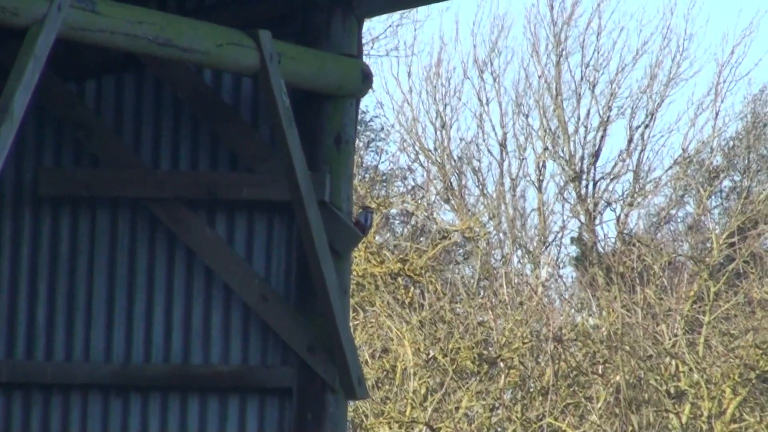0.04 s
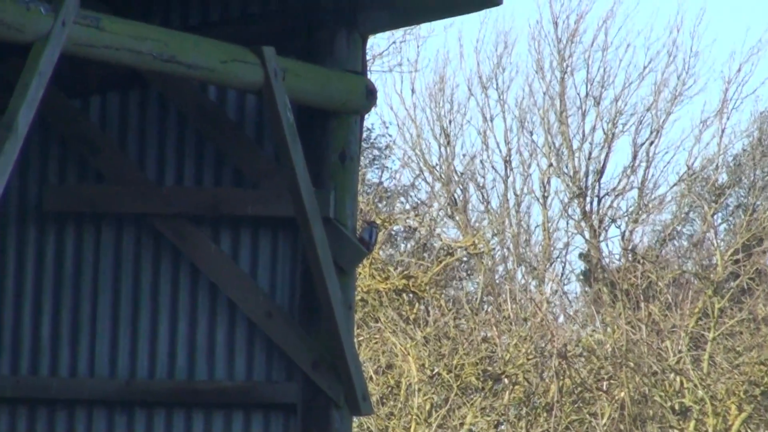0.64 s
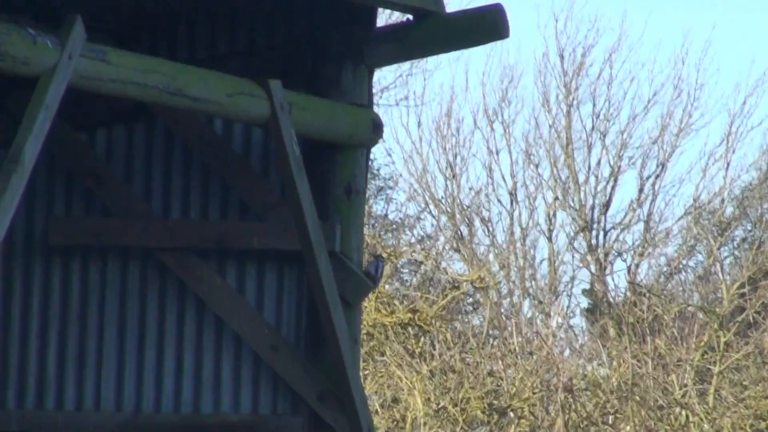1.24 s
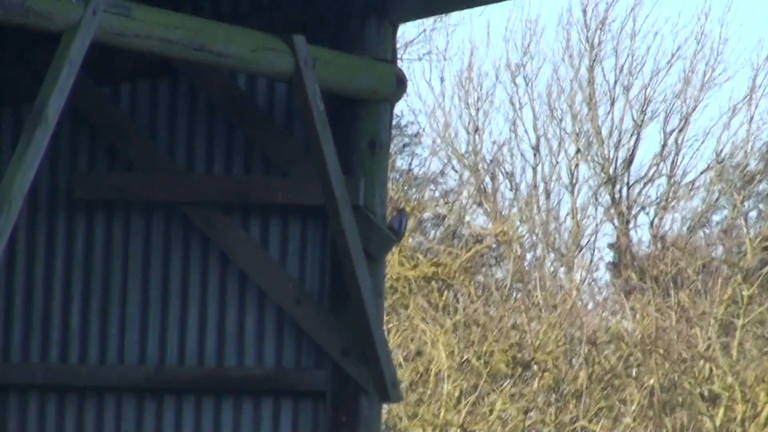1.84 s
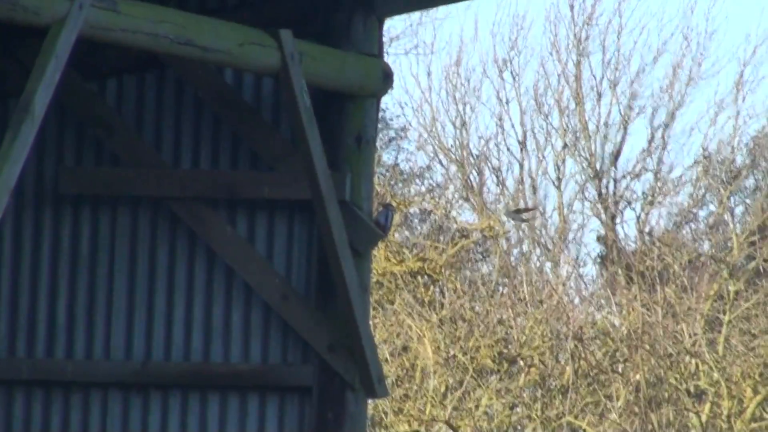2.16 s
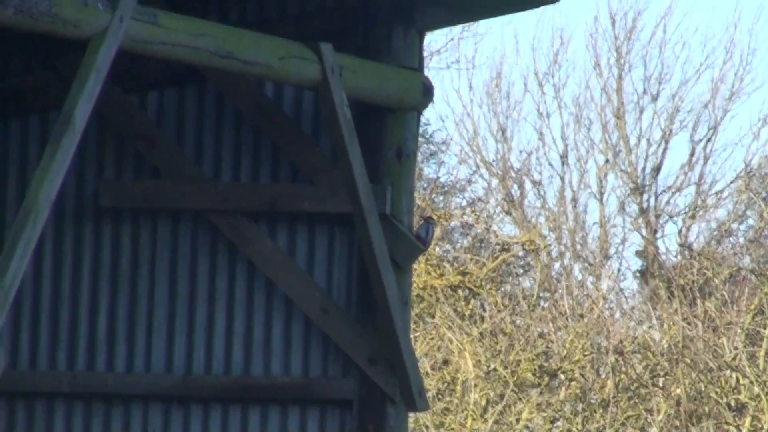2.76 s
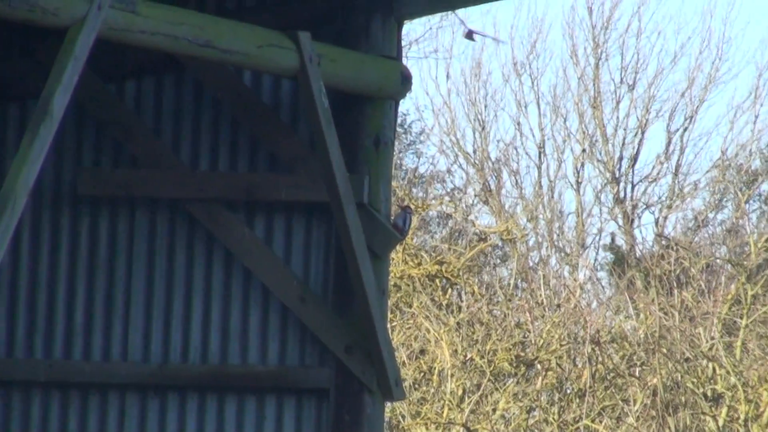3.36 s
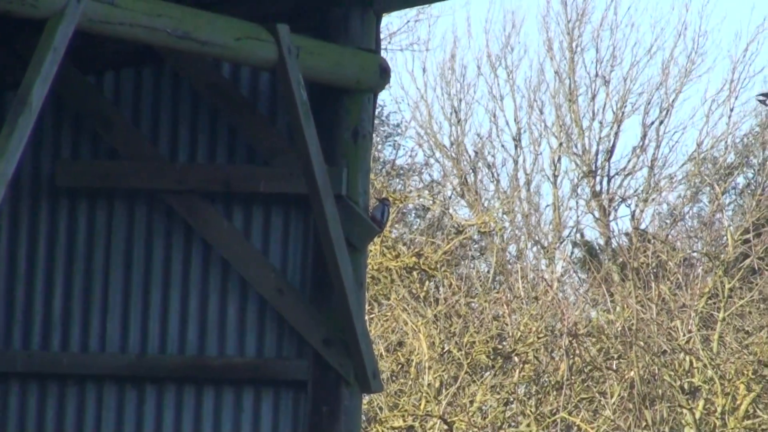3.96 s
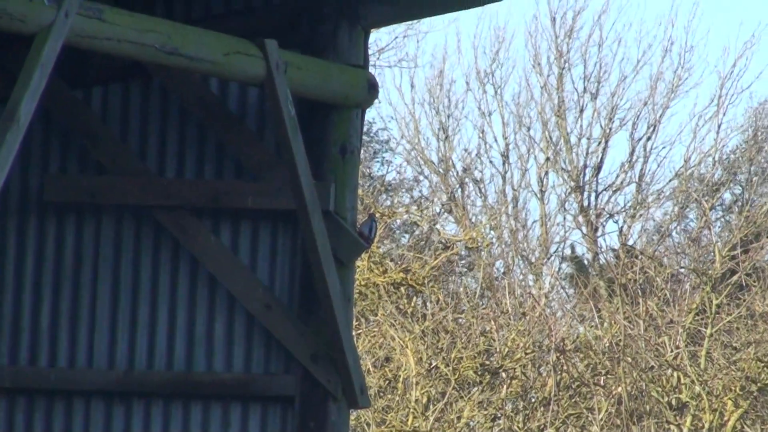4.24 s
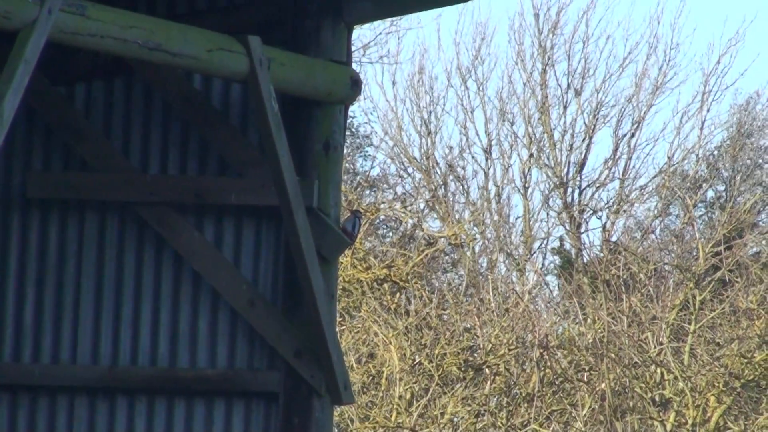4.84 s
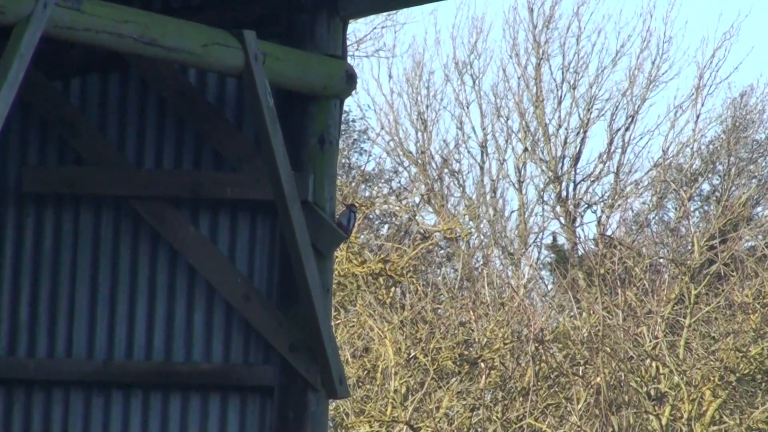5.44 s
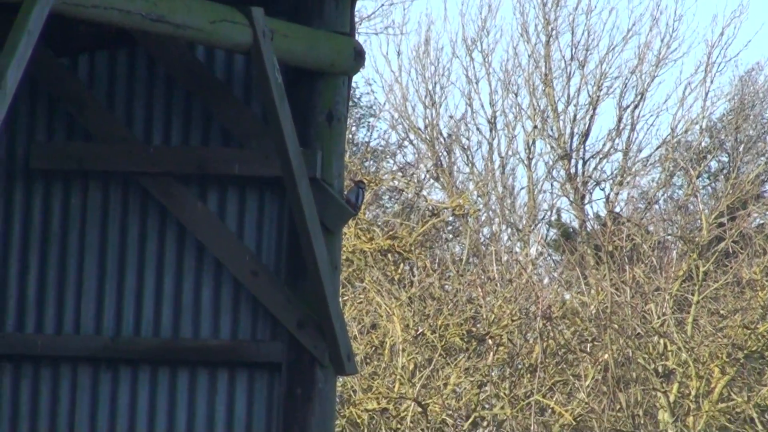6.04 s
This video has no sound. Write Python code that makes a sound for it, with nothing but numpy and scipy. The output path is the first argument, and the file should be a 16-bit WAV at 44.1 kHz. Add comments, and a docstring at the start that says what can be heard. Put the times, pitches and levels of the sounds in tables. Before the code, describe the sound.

Outdoors by a hedgerow, the end of a woodpecker's drum roll rings out loudly and fades among the trees. Gusts of wind follow, buffeting the microphone with a low rumble and soft pops, strongest near the end. Throughout, faint small birds give short chirps, falling whistles, dry ticks and a few thin high notes, over a slight hiss of twigs and a distant hush.

```python
"""A woodpecker's last few blows ring a dead branch and echo through the trees. We stand at a winter
hedgerow beside a tin shed: small birds chirp, scold and whistle at several distances, and a nearer one
gives four thin, very high calls. Gusts cross the microphone, hardest near the end, their large eddies
rumbling and their small ones popping at the ports. Behind it all, dry twigs hiss over a soft far hush."""
import sys
import numpy as np
from scipy import signal
from scipy.io import wavfile

SR = 44100
rng = np.random.default_rng(int(sys.argv[2]) if len(sys.argv) > 2 else 0)


def put_to_file(sound):
    """Save the sound as 16-bit audio at rate SR, in the file named by the first command-line argument."""
    columns = np.atleast_2d(sound).T  # one column per channel
    safe = np.clip(columns, -1, 1)
    whole_steps = np.round(safe * 32767)
    wavfile.write(sys.argv[1], SR, whole_steps.astype(np.int16))


N = 273861
TIME = np.arange(N) / SR

# Table levels are relative, ahead of the mix; pan is left minus right.
# how alike airborne noise is on the two channels: (frequency [Hz], likeness [0-1])
AIR_LIKENESS = [(60, 0.9), (500, 1), (2000, 0.21), (7000, 0.48), (9500, 0.56), (11500, 1)]


def woodpecker(level_db=7, low_cut_hz=520):
    """Off in the trees, the last blows of a drum roll ring a branch and echo through the wood."""
    # beak on dead wood: (time [s], level [dB])
    knocks = [(0.001, 1.5), (0.027, 2.5), (0.069, 0.5), (0.111, -1.5)]
    # the branch's modes: (frequency [Hz], width [Hz], level [dB])
    branch = [(580, 340, -10.5), (800, 74, -1), (963, 71, 4.5), (1284, 72, 0), (1478, 26, -2),
              (2100, 500, -13), (2680, 520, -17.5), (4160, 2700, -32.5), (7260, 1500, -36)]
    blows, wood = np.full(N, 1e-18), 0
    for s, db in knocks:
        add(blows, s, from_db([db + level_db]))
    for k, (hz, width, db) in enumerate(branch):
        r = np.exp(-np.pi * width / SR)
        mode = signal.lfilter([1, 0, -1], [1, -2 * r * np.cos(2 * np.pi * hz / SR), r * r], blows)
        wood = wood + (-1) ** k * from_db(db) * (1 - r * r) / 2 * mode
    low_cut = signal.butter(2, low_cut_hz, "high", fs=SR, output="sos")  # a thin branch has little bass
    wood = panned(signal.sosfilt(low_cut, wood), pan_db=-0.3)
    return from_db(-9) * wood + from_db(2) * trees(wood, t60=0.1) + from_db(-2) * trees(wood, t60=0.82)


def thin_calls(hook=0.2, drop=0.1, turn_s=0.0045):
    """The nearest bird: each pitch snaps up, sags slowly and drops away as the note closes."""
    # four high calls: (time [s], length [s], top [Hz], middle [Hz], late [Hz], level [dB], pan [dB])
    calls = [(4.434, .17, 8480, 7720, 7080, -61.5, 8), (4.696, .155, 7740, 7570, 7130, -57.5, 10),
             (4.929, .135, 8000, 7760, 7260, -53, 11), (5.137, .121, 7860, 7670, 7330, -56, 10)]
    out = np.zeros((2, N))
    for s, length, top, middle, late, db, pan_db in calls:
        u = progress(length)
        arch = 1 - hook * np.exp(-u * length / turn_s) - drop * np.exp((u - 1) * length / turn_s)
        swell = np.abs(np.sin(np.pi * u)) ** 0.25
        tone = syrinx(pitch_arc(u, top, middle, late) * arch, waver=0.0057, shimmer_db=1.5)
        add(out, s, panned(from_db(db - 1) * swell * tone, pan_db))
    return out


def phrases(pan_db=6):
    """One bird repeats a slur and two soft pips from the same perch, left of the microphone."""
    # each repeat: (time [s], level [dB])
    repeats = [(.092, -60.5), (0.789, -61.5), (1.55, -59.5), (2.272, -61.5)]
    # its three notes: (delay [s], length [s], middle pitch [Hz], fall [Hz], level [dB])
    phrase = [(0, .037, 2700, 650, -1.5), (0.152, 0.021, 2410, 330, -3.5), (0.238, 0.033, 2335, 262, -5.5)]
    notes = [(s + delay, length, hz, fall, db + note_db, pan_db)
             for s, db in repeats for delay, length, hz, fall, note_db in phrase]
    return whistles(notes, waver=0.013, shimmer_db=0, bow=0.24)


def slurs(fall_hz=1030):
    """Lone whistles along the hedge all fall by the same step, so the short ones are the steepest."""
    # falling notes: (time [s], length [s], middle pitch [Hz], level [dB], pan [dB])
    calls = [(0.596, 0.061, 3150, -64.5, 9), (.705, 0.055, 3850, -71, 7), (1.101, 0.054, 3520, -63.5, 11),
             (1.42, 0.036, 3100, -65, 7), (1.438, .125, 3580, -67.5, 8), (1.623, 0.023, 6600, -72, -2),
             (1.81, 0.03, 6500, -70, -2), (1.945, 0.083, 6100, -64.5, -3), (2.207, 0.12, 3180, -71, 6),
             (2.579, .037, 5180, -70, 13), (2.648, 0.055, 4040, -65.5, 11), (2.94, 0.13, 6960, -81, 5),
             (3.128, 0.023, 3630, -60.5, 8), (3.4, .06, 3430, -64.5, 6), (4.05, 0.034, 4000, -68.5, 10),
             (4.123, 0.027, 2400, -69, 1), (4.135, .038, 4360, -72, 6), (4.335, .042, 3580, -68.5, 6),
             (4.38, 0.047, 7070, -71, 7), (4.795, 0.039, 3650, -66, 7), (5.975, 0.11, 6660, -78, -2),
             (6.131, 0.037, 3440, -65.5, 4)]
    notes = [(s, length, hz, fall_hz, db, pan_db) for s, length, hz, db, pan_db in calls]
    return whistles(notes, waver=0.017, shimmer_db=1.5, bow=0.028)


def chirps(rasp_depth=0.1324):
    """Fast up-down-up sweeps on the left, roughened by a quick flutter of the pitch."""
    # twittering: (time [s], length [s], top pitch [Hz], level [dB], rasp [0-1])
    calls = [(0.182, 0.054, 5480, -58, .55), (0.227, 0.034, 4710, -64, 0.71),
             (1.389, 0.052, 4800, -64.5, 0.43), (1.605, 0.067, 5400, -54.5, 0.23),
             (2.296, 0.1, 5000, -62, 0.74), (3.027, 0.09, 5100, -61.5, .3), (3.245, 0.045, 6250, -56.5, 1),
             (3.265, 0.046, 4900, -53.5, .43), (3.56, 0.071, 5780, -65, .6),
             (3.604, 0.05, 5270, -55.5, 0.4), (4.691, .1, 5200, -61.5, 0.58),
             (5.351, 0.035, 5700, -60, 0.36), (5.445, 0.045, 4220, -62.5, 0.35),
             (5.708, 0.068, 5610, -61, .55), (5.803, 0.034, 6270, -55.5, 0.5),
             (5.824, 0.038, 4970, -53.5, 0.53)]
    # the course of one chirp: (share of its length [0-1], pitch over top pitch [ratio], level [dB])
    zigzag = [(0, 0.6, -7.5), (0.119, .84, -5), (0.298, 0.99, -8), (0.439, .82, -3), (0.582, .67, -3.5),
              (0.658, .68, -13), (0.798, .8, 1.5), (.92, 0.8, -14), (1, 0.91, -12)]
    share, pitch, level_db = np.transpose(zigzag)
    out = np.zeros(N)
    for s, length, top, db, rasp in calls:
        u = progress(length)
        tone = syrinx(top * np.interp(u, share, pitch), waver=rasp * rasp_depth, shimmer_db=1.5)
        add(out, s, from_db(db + np.interp(u, share, level_db)) * tone)
    return panned(out, pan_db=9)


def tiks():
    """A scolding bird gives dry, toneless bursts."""
    # alarm notes: (time [s], length [s], level [dB])
    alarms = [(0.193, 0.03, -56), (0.265, 0.028, -58.5), (3.242, 0.033, -61), (3.352, .015, -60),
              (3.516, 0.04, -56)]
    # their spectrum: (frequency [Hz], density [dB])
    colour = [(1500, -30), (3000, 0), (4500, -0.5), (7500, -6), (11000, -27), (15000, -26)]
    gate = np.zeros(N)
    for s, length, db in alarms:
        add(gate, s, from_db(db) * np.sin(np.pi * progress(length)))
    noise = banded_noise(colour, AIR_LIKENESS, flicker_db=2, flicker_per_s=200)
    return panned(gate * noise, pan_db=5)


def chatter(count=45, first_s=0.4, last_s=4.6, low_hz=3000, high_hz=5200, pan_db=6):
    """Many birds deep in the hedge slip in faint, short falling notes."""
    notes = []
    for when, long, pitch, slope, loud in rng.random((count, 5)):
        s = first_s + when * (last_s - first_s)
        length = 0.02026 + 0.0356 * long
        hz = low_hz * (high_hz / low_hz) ** pitch
        fall = 0.345 * hz * (1 + slope) / 2
        notes.append((s, length, hz, fall, -77 + 4 * loud, pan_db))
    return whistles(notes, waver=0.035, shimmer_db=3, bow=0.058)


def far_notes(sag=0.0178):
    """Birds far off among the trees hold whistles that barely sag."""
    # held notes: (time [s], length [s], pitch [Hz], level [dB], pan [dB])
    calls = [(0.637, 0.126, 4285, -64, -3), (0.947, 0.082, 5020, -68, 8), (1.11, .13, 4300, -65, -4),
             (1.324, 0.31, 1320, -67, -3), (1.611, 0.043, 4226, -57, -1), (1.853, 0.16, 5620, -75, 15),
             (1.94, 0.16, 1162, -64.5, 5), (2.133, 0.084, 4000, -68.5, 9), (2.435, .24, 5290, -73.5, 8),
             (3.193, .077, 6800, -79, 3), (3.615, 0.074, 952, -62.5, 3), (3.74, .21, 3230, -79.5, 6),
             (3.893, .1, 1035, -67.5, 3), (4.547, .17, 3290, -79, -2)]
    notes = [(s, length, hz, sag * hz, db, pan_db) for s, length, hz, db, pan_db in calls]
    return whistles(notes, waver=0.0098, shimmer_db=5.4, bow=0.055)


def wind(buffet_s=0.04, surge_db=1.7, surges_per_s=38):
    """One airflow over the microphone drives both rumble and flutter; single pops ride on top."""
    # wind strength at the microphone: (time [s], level [dB])
    strength = [(0.0, -59), (0.11, -55.5), (0.18, -61.5), (0.29, -53), (0.43, -54), (0.6, -38.5),
                (1.18, -58), (1.31, -41), (2.19, -37.5), (2.27, -47.5), (2.52, -38.0), (3.72, -37),
                (4.08, -49), (4.39, -35.0), (5.29, -46), (5.36, -54.5), (5.96, -22), (6.2, -35.5)]
    # separate buffets: (time of crest [s], gain [dB])
    buffets = [(1.521, 8.5), (1.71, 7.0), (1.809, 6), (2.56, 4.5), (2.66, 4.5), (2.99, 5), (3.1, 6.5),
               (3.22, 3.5), (3.479, 8), (4.581, 5.0), (4.759, 5.5), (4.859, 4.5), (4.991, 9.5), (5.221, 9),
               (5.788, 11), (6.121, 2.5)]
    buffets_db = sum(db * np.exp(-((TIME - s) / buffet_s) ** 2) for s, db in buffets)
    wind_db = curve(strength) + buffets_db + surge_db * drift(surges_per_s)
    return rumble(wind_db) + flutter(wind_db) + pops()


def rumble(wind_db):
    """Large eddies buffet both microphone ports in lumps."""
    # their spectrum: (frequency [Hz], density [dB])
    colour = [(25, -21), (50, -6), (85, -0.5), (130, 0), (200, -4.5), (300, -10.5), (450, -19), (700, -24),
              (1200, -95)]
    # how alike the two ports feel them: (frequency [Hz], likeness [0-1])
    likeness = [(30, 0.45), (90, 0.75), (180, 0.5), (400, 0.48)]
    noise = banded_noise(colour, likeness, flicker_db=3, flicker_per_s=40)
    return panned(from_db(wind_db - 1) * noise, pan_db=-2.1)


def flutter(wind_db, breeze_db=-38, spread_db=7.5):
    """Small eddies stream over the ports; faster wind makes them louder, denser and finer."""
    # choppiness, as small eddies above or below their usual share: (time [s], gain [dB])
    chop = [(0, -10), (1.5, 3.5), (2.2, 4.5), (3.1, -5), (3.7, -9), (4.5, 3), (4.95, -2.5), (5.25, 5.5),
            (5.7, -6), (5.96, -0.5), (6.08, -2), (6.21, -4)]
    excess_db = wind_db - breeze_db
    level_db = -63.5 + 1.66 * excess_db + curve(chop)
    speed_db = 0.7 * excess_db
    per_s = 120 * from_db(1.4 * speed_db)
    out = 0
    for hz, gain_db in [(380, 2), (880, 0), (1400, -11 + 0.72 * speed_db)]:
        sizes = from_db(spread_db * np.minimum(rng.exponential(1, (3, N)), 4))
        signs = rng.choice([-1, 1], (3, N))
        arrivals = rng.random((3, N)) < per_s / SR
        hits = sizes * signs * arrivals / np.sqrt(per_s)
        ports = hits[:2] + 0.5 * hits[2]  # the third stream strikes both ports
        swings = signal.fftconvolve(ports, eddy(hz)[None], "same", axes=1)
        out = out + from_db(gain_db) * rms_one(swings)
    return panned(from_db(level_db) * out, pan_db=-7)


def pops(level_db=5, crest_s=0.0012):
    """The hardest eddies stand out as single soft pops, often on one side of the microphone."""
    # hard eddies: (time [s], level [dB], pitch [Hz], pan [dB])
    hard_eddies = [(1.337, -34.5, 695, -22), (1.534, -42, 790, -29), (1.611, -35, 1093, -16),
                   (1.713, -33, 655, -26), (1.784, -36, 780, -17), (1.831, -36.5, 700, 1.5),
                   (1.922, -35, 1060, 2.0), (1.996, -33, 790, 0), (2.03, -40, 875, 2.5),
                   (2.053, -39, 696, 0), (2.153, -40, 743, 1.0), (2.163, -37.5, 1020, -1),
                   (2.413, -41, 821, 0.5), (2.566, -39, 703, -23), (2.638, -25.5, 755, -21),
                   (2.703, -34, 700, -23), (2.832, -43, 700, -13), (3.486, -40.5, 810, -0.5),
                   (4.413, -40, 670, -4), (4.588, -42, 720, 1), (5.238, -39.5, 830, -1.0),
                   (5.654, -32, 740, -20), (5.769, -29, 800, -25), (5.801, -18.5, 1075, -19),
                   (5.943, -31, 1030, 4), (5.974, -23.5, 930, 3), (6.098, -21.5, 869, -18),
                   (6.173, -37, 754, -9.0)]
    out = np.zeros((2, N))
    for s, db, hz, pan_db in hard_eddies:
        swing = eddy(hz)
        add(out, s + crest_s - len(swing) / 2 / SR, panned(from_db(db + level_db) * swing, pan_db))
    return out


def eddy(hz, width_cycles=0.59, rise=0.09):
    """The pressure swing of one vortex crossing a port: a cycle or two that quicken as it passes."""
    cycles = np.arange(-300, 301) / SR * hz
    return np.sin(2 * np.pi * (cycles + rise * cycles ** 2)) * np.exp(-(cycles / width_cycles) ** 2)


def rustle():
    """Dry twigs hiss faintly as the breeze reaches the hedge."""
    # breeze in the twigs: (time [s], level [dB])
    breeze = [(0, -77), (1.2, -79), (1.75, -68), (2.2, -74), (3.3, -70), (4.0, -70.5), (4.7, -70),
              (5.4, -67), (5.8, -68), (6.21, -72)]
    # the hiss's spectrum: (frequency [Hz], density [dB])
    colour = [(1500, -3), (3000, 0), (6000, 5.5), (9000, -1), (15000, -3.5)]
    return from_db(curve(breeze)) * banded_noise(colour, AIR_LIKENESS, flicker_db=1.5, flicker_per_s=30)


def hush(level_db=-53):
    """The soft, low hush of the far fields."""
    # its spectrum: (frequency [Hz], density [dB])
    colour = [(25, 1), (70, 7.5), (130, -14), (320, -22.5), (700, -10), (1100, -18), (1600, -20.5),
              (2400, -22), (3800, -22.5), (5200, -30.5), (7000, -33.5), (10000, -39.5), (12500, -47),
              (15500, -17)]
    return from_db(level_db) * banded_noise(colour, AIR_LIKENESS, flicker_db=1.5, flicker_per_s=8)


def trees(x, t60):
    """Trunks and twigs scatter a sound into a diffuse tail that falls 60 dB in t60 seconds."""
    t = TIME[:SR]
    scatter = rng.standard_normal((2, SR)) + 3 * rng.standard_normal(SR)  # mostly alike on both sides
    tail = scatter * from_db(-60 * t / t60) * (1 - np.exp(-t / 0.0047))
    return signal.fftconvolve(x, tail / np.sqrt(np.sum(tail ** 2) / 2), axes=1)[:, :N]


def reflections(x, count=6, first_s=0.012, last_s=0.04):
    """The shed wall and nearby trunks return a few separate echoes."""
    out = np.zeros((2, N))
    for delay in rng.uniform(first_s, last_s, count):
        add(out, delay, x / np.sqrt(count))
    return out


def whistles(notes, waver, shimmer_db, bow):
    """Each note swells and fades as its pitch falls; more bow levels the fall off sooner."""
    out = np.zeros((2, N))
    for s, length, hz, fall_hz, db, pan_db in notes:
        u = progress(length)
        swell = np.sqrt(np.abs(np.sin(np.pi * u)))
        pitch = pitch_arc(u, hz + fall_hz * (0.5 + bow), hz, hz - fall_hz * (0.5 - bow))
        add(out, s, panned(from_db(db) * swell * syrinx(pitch, waver, shimmer_db), pan_db))
    return out


def syrinx(hz, waver, shimmer_db):
    """A bird's voice: a nearly pure tone whose pitch and strength tremble."""
    trembling_hz = hz * (1 + waver * drift(711.4, len(hz)))
    phase = 2 * np.pi * np.cumsum(trembling_hz) / SR
    return np.sqrt(2) * np.sin(phase) * from_db(shimmer_db * drift(132, len(hz)))


def pitch_arc(u, start, middle, end):
    """A parabola through three pitches."""
    return start * (1 - u) * (1 - 2 * u) + middle * 4 * u * (1 - u) + end * u * (2 * u - 1)


def progress(length):
    """Runs from 0 to 1 over a note."""
    return np.linspace(0, 1, max(int(length * SR), 16))


def banded_noise(spectrum, likeness, flicker_db, flicker_per_s):
    """Half-octave bands of stereo noise, each with its own level, flicker and likeness; rms 1."""
    out, edges = 0, 22 * 2 ** np.arange(0, 9.6, 0.5)
    white = rng.standard_normal((2, 2, N))
    for k, (low, high) in enumerate(zip(edges, edges[1:])):
        if low > spectrum[-1][0]:
            break
        band = signal.butter(2, [low, high], "band", fs=SR, output="sos")
        mid, side = signal.sosfilt(band, white[k % 2])
        hz = np.sqrt(low * high)
        alike = at_hz(likeness, hz)
        gain = from_db(at_hz(spectrum, hz) + flicker_db * drift(flicker_per_s))
        out = out + gain * (np.sqrt(1 + alike) * mid + np.sqrt(1 - alike) * side * [[1], [-1]])
    return rms_one(out)


def drift(per_s, size=N):
    """A random wander of spread 1 with about per_s turns a second."""
    steps = np.arange(size) * per_s / SR
    return np.interp(steps, np.arange(8192), rng.standard_normal(8192)) * np.sqrt(3 / 2)


def from_db(db):
    """Decibels to gain."""
    return 10 ** (np.asarray(db) / 20)


def rms_one(x):
    """Scale to unit power."""
    return x / np.sqrt(np.mean(x ** 2) + 1e-20)


def curve(rows):
    """Join (time [s], value) rows by straight lines."""
    return np.interp(TIME, *np.transpose(rows))


def at_hz(rows, hz):
    """Read (frequency [Hz], value) rows on a log-frequency axis."""
    frequencies, values = np.transpose(rows)
    return np.interp(np.log(hz), np.log(frequencies), values)


def panned(x, pan_db):
    """Place a sound with the left channel pan_db above the right."""
    return x * rms_one(from_db([[pan_db / 2], [-pan_db / 2]]))


def add(out, s, sound):
    """Mix a sound in at time s."""
    at = int(np.clip(round(s * SR), 0, N - 1))
    out[..., at:at + sound.shape[-1]] += sound[..., :N - at]


def scene():
    """From the hedgerow: birds, the farthest with the longest echo, the fields' hush, and wind."""
    near = thin_calls()
    hedge = phrases() + slurs()
    twitter = chirps() + chatter()
    scold = tiks()
    far = far_notes()
    birds = near + from_db(-18) * trees(near, t60=0.55)
    birds += from_db(5.5) * hedge + from_db(-2.5) * reflections(hedge)
    birds += from_db(-4) * trees(hedge, t60=1)
    birds += from_db(3.5) * twitter + from_db(-15) * reflections(twitter)
    birds += from_db(1) * trees(twitter, t60=0.4)
    birds += scold + from_db(-27) * trees(scold, t60=0.31)
    birds += far + from_db(-3) * trees(far, t60=2.1)
    return birds + hush() + woodpecker() + rustle() + wind()


def record(dry, cutoff_hz=15750):
    """The recorder cuts the top steeply."""
    return signal.sosfilt(signal.ellip(12, 0.1, 70, cutoff_hz, fs=SR, output="sos"), dry)


dry = scene()
out = record(dry)
put_to_file(out)
```